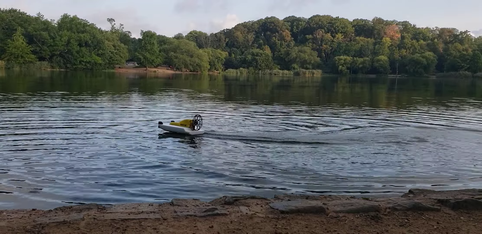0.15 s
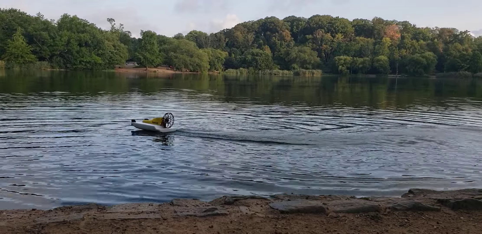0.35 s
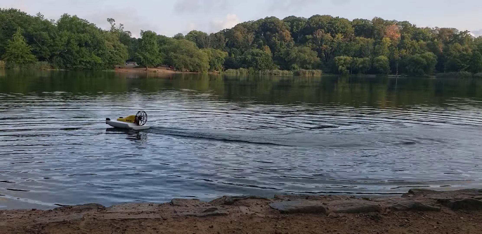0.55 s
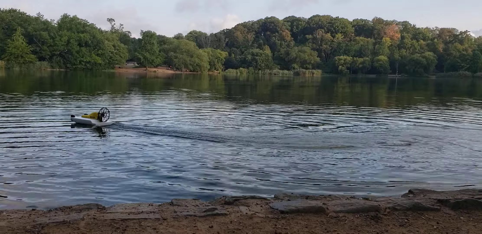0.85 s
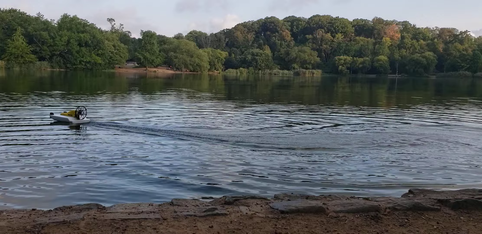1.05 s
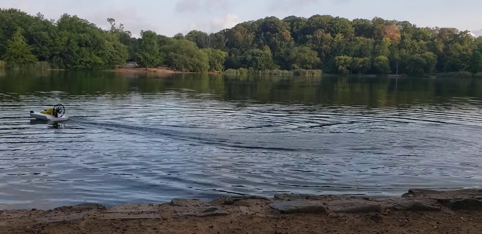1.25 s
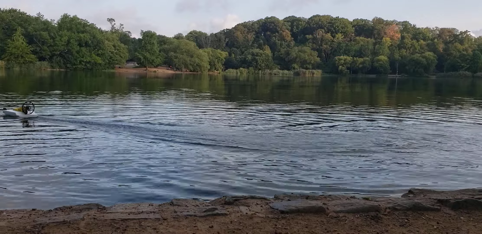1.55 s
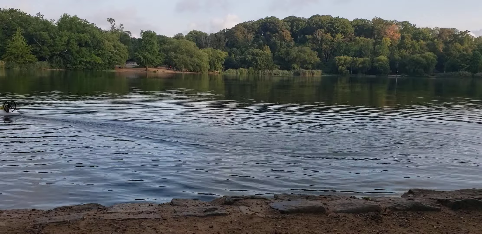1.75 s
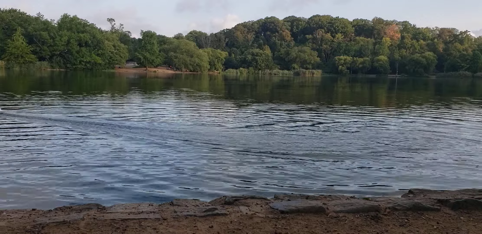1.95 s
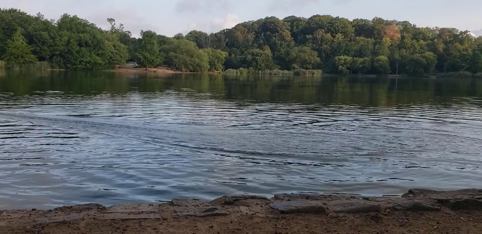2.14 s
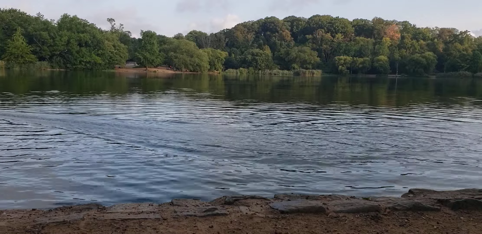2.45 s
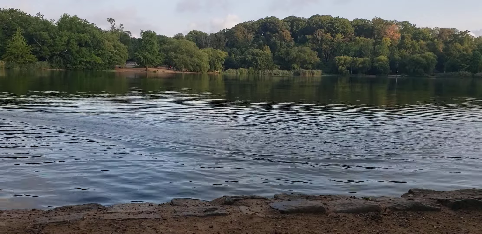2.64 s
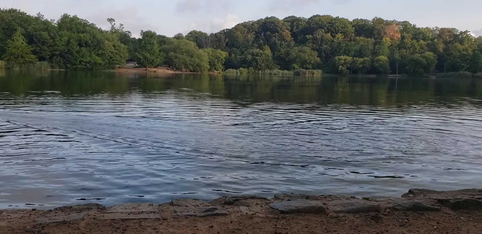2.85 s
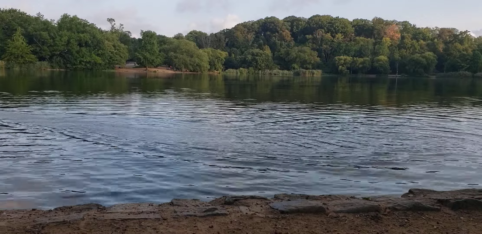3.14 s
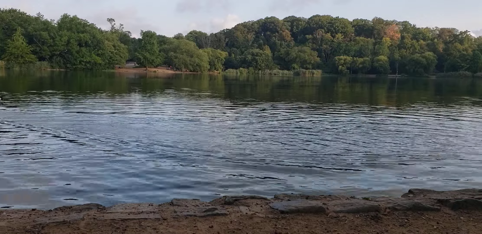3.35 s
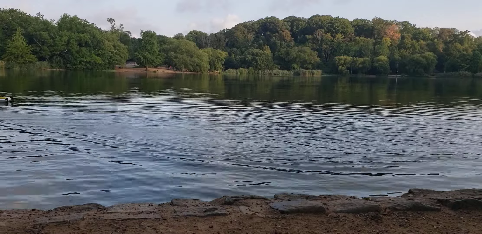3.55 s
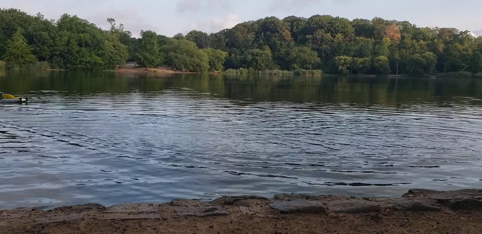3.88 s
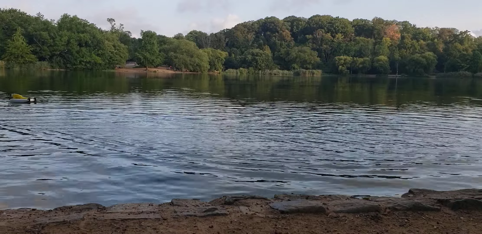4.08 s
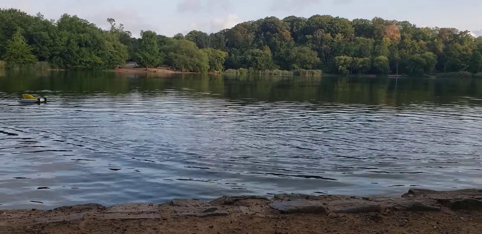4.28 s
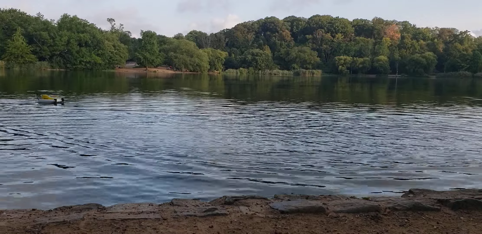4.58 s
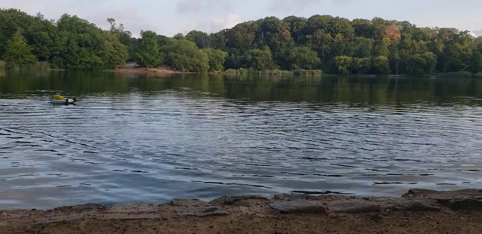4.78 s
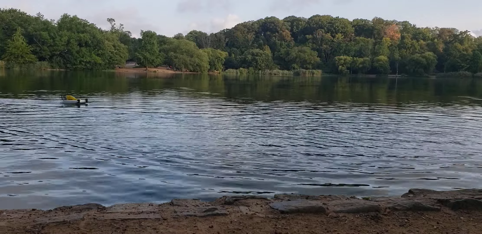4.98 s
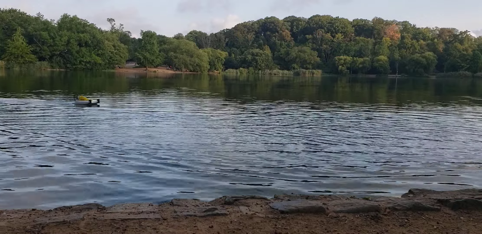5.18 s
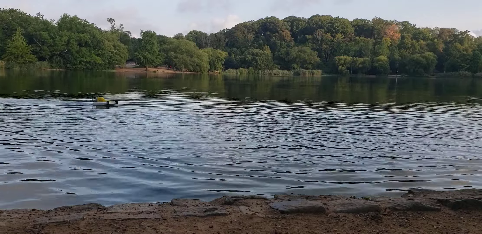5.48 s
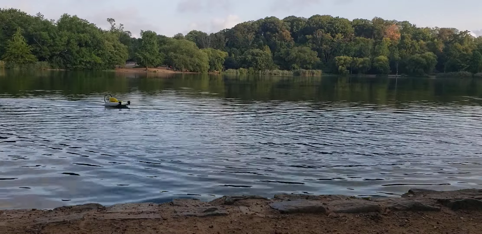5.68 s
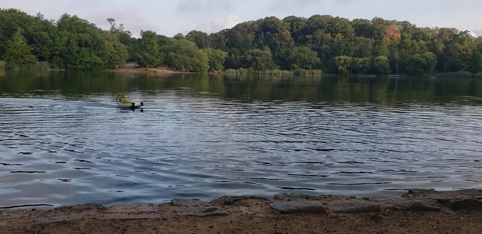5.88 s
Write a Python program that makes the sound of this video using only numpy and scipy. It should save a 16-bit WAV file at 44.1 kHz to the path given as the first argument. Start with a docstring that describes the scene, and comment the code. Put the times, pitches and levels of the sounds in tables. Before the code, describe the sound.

Over a far traffic rumble, a small electric propeller boat buzzes and whistles thinly, easing off several times before returning to full speed.

```python
"""A model airboat turns on a lake, heard from the left by two spaced microphones over far traffic.
First it heads away at full speed: its electric motor and air propeller whine, the blades tear the air
and the speed controller whistles. From about 2 s the throttle dips and recovers several times as the
boat swings round. Soon after 4 s it is back at full speed and coming closer. The whistle is faint
by then, and swells again at the very end."""
import sys
import numpy as np
from scipy import signal
from scipy.fft import rfft, irfft
from scipy.io import wavfile
from scipy.ndimage import uniform_filter1d

SR = 44100
rng = np.random.default_rng(int(sys.argv[2]) if len(sys.argv) > 2 else 0)


def persist_wave(psi):
    """Save psi, clipped to +-1, as 16-bit WAV."""
    counts = np.round(np.clip(psi, -1, 1) * 32767).astype(np.int16)
    wavfile.write(sys.argv[1], SR, np.atleast_2d(counts).T)


N = 291942
TIME = np.arange(N) / SR
STEPS = np.arange(0, N + 128, 128) / SR  # a coarser clock for slow changes, in seconds
SIDES = np.array([[.5], [-.5]])  # splits a difference between the left and right microphones


def gain_of(db):
    """Turns decibels into a number to multiply by."""
    return 10 ** (np.asarray(db) / 20)


def at_pitch(points, hz):
    """Looks up a table at the frequencies hz, on a log scale."""
    f, value = np.transpose(points)
    return np.interp(np.log(hz + 1), np.log(f + 1), value)


def curves(rows, t=STEPS):
    """Looks up every column of a table at the times t."""
    times, *columns = np.transpose(rows)
    return np.array([np.interp(t, times, column) for column in columns])


def drift(fastest_hz, slant=0.52):
    """A random wobble of typical size 1; more slant favours the slowest swings."""
    hz = np.geomspace(fastest_hz / 20, fastest_hz, num=16)[:, None]
    wobble = (np.sin(2 * np.pi * (hz * STEPS + rng.random(hz.shape))) / hz ** slant).sum(0)
    return wobble / wobble.std()


def hiss(field_db, likeness, lead_s, size, patchy_db):
    """Noise shaped over pitch and time, partly alike in both microphones."""
    frames = dict(fs=SR, nperseg=size, noverlap=size * 3 // 4)
    hz, t, (left, other) = signal.stft(rng.standard_normal((2, N)), **frames)
    patches = uniform_filter1d(rng.standard_normal(left.shape), size=12, axis=0)
    patches = uniform_filter1d(patches, size=10, axis=1)
    alike = np.clip(at_pitch(likeness, hz), 0, 1)[:, None]
    delay = np.exp(-2j * np.pi * hz[:, None] * lead_s(t))
    right = alike * left * delay + np.sqrt(1 - alike ** 2) * other
    gain = np.sqrt(SR / 2) * gain_of(field_db(hz, t) + patchy_db * patches / patches.std())
    return signal.istft(np.array([left, right]) * gain, **frames)[1][:, :N]


# How strong the rumble is at each pitch: f/Hz, level/dB per Hz
RUMBLE_COLOUR = [(15, -100), (28, -77), (40, -73), (52, -58), (60, -52), (68, -59.5), (95, -62), (140, -66),
                 (250, -75), (500, -85.5), (1000, -92.5), (3000, -100), (7600, -102), (8700, -116),
                 (10000, -103), (15000, -104)]
# How alike the rumble is left and right: f/Hz, likeness/0 to 1
RUMBLE_LIKENESS = [(60, 0.99), (150, 1), (400, 0.58), (1500, 0.036), (5000, 0.033)]
# The roar's fade, used as a change around its average: t/s, level/dB
ROAR_FADE = [(0, -43), (1.1, -43.5), (2.8, -45), (6.62, -47.5)]


def rumble():
    """Far traffic and air over the lake: a steady drone near 60 Hz, and a roar above it that fades."""
    def field_db(hz, t):
        roar_db = curves(ROAR_FADE, t)[0]
        roar_band = at_pitch([(70, 0), (120, 1), (400, 1), (900, 0)], hz)[:, None]
        return at_pitch(RUMBLE_COLOUR, hz)[:, None] + roar_band * (roar_db - roar_db.mean())
    return hiss(field_db, RUMBLE_LIKENESS, lead_s=lambda t: .00009, size=4096, patchy_db=0.87)


# Moves of the throttle stick: t/s, new setting/share of full speed
STICK_MOVES = [(1.891, .7367), (2.109, 1.0022), (2.417, .8084), (2.517, .9573), (2.695, 1.0035),
               (3.0215, .7256), (3.167, .8953), (3.5, .7567), (3.742, .6829), (3.8615, .8887),
               (4.016, 1.0021)]


def throttle_speed(move_s=.198, motor_lag_s=.1):
    """Share of full speed: the stick slides to each setting and the motor follows a little late."""
    starts, setting = np.transpose(STICK_MOVES)
    progress = np.clip((STEPS - starts[:, None]) / move_s, 0, 1)
    moved = np.diff(setting, prepend=1) @ progress
    inertia = np.exp(-STEPS[1] / motor_lag_s)
    return 1 + signal.lfilter([1 - inertia], [1, -inertia], moved)


# How fast the shaft spins at full throttle: t/s, f/Hz
FULL_SPIN = [(0, 267.6), (.5, 266.6), (.9, 265.1), (1.9, 264.7), (4.6, 266.5), (5.2, 266.7), (5.8, 266.9),
             (6.35, 266.7), (6.62, 266.0)]


def shaft_hz():
    """How many times a second the motor and propeller turn."""
    return throttle_speed() * curves(FULL_SPIN)[0]


# How much sooner the boat's sound reaches the left microphone: t/s, lead/ms
LEFT_LEAD = [(0, 0.0087), (.45, 0.069), (1.05, 0.14), (1.65, 0.2), (2.85, 0.25), (3.15, 0.25), (3.75, 0.23),
             (4.65, 0.19), (5.25, 0.17), (6.62, 0.081)]


def boat_tone(hz, db, shift_turns=0, sway_db=1.4):
    """One pure tone: it reaches the left microphone first, and moving air sways it between the two."""
    turns = np.cumsum(hz) * STEPS[1] + shift_turns + SIDES * hz * curves(LEFT_LEAD) / 1000
    gains = np.sqrt(2) * gain_of(db + 2 * SIDES * sway_db * drift(25, slant=0))
    return np.array([np.interp(TIME, STEPS, gain) * np.sin(2 * np.pi * np.interp(TIME, STEPS, turn))
                     for gain, turn in zip(gains, turns)])


# The boat's base levels at full speed: t/s, whine level/dB, rush level/dB, rush bass and top lift/dB
BOAT_LEVELS = [(0, -60.5, -72, 1), (.4, -61, -69, -1), (.75, -60, -72, 4), (1.2, -61, -69.5, -0.5),
               (1.8, -62, -69.5, 1.5), (2.25, -64.5, -71.5, -1.5), (2.7, -64.5, -73.5, 0),
               (2.9, -62, -70, -2.5), (3.2, -66, -75.5, -2), (3.4, -70, -76, -10), (3.8, -68, -75, -3),
               (4.05, -72.5, -75, -6.5), (4.6, -67.5, -79, -2), (4.9, -67.5, -75, -1),
               (5.4, -65.5, -78.5, -1.5), (5.8, -64.5, -78, 0.5), (6.15, -66, -78, 0),
               (6.35, -66.5, -74, 1), (6.62, -67, -75, 1)]
# The rush at each pitch, added to its base level: f/Hz, level/dB per Hz
# Near 2.4 kHz the echo off the water cancels the direct sound and leaves a dip.
RUSH_COLOUR = [(150, -9.5), (400, -15), (900, -16.5), (1700, -13), (2050, -15), (2350, -21), (2750, -14.5),
               (3200, -14.5), (3900, -14.5), (4600, -13.5), (5300, -15), (6200, -11.5), (7000, -11.5),
               (7900, -20.5), (8700, -56), (9800, -22.5), (11000, -18), (14500, -18)]
# How alike the rush is left and right: f/Hz, likeness/0 to 1
RUSH_LIKENESS = [(500, 0.99), (1200, 0.53), (2000, 0.97), (3200, 0.87), (5000, 0.63), (7500, 0.29),
                 (12000, 0.38)]


def propeller_rush(speed_power=0.79):
    """Air torn by the blades: it gets louder with speed and pulses once and twice a turn."""
    gusts_db = 0.49 * drift(30, slant=0)

    def field_db(hz, t):
        level_db, lift_db = curves(BOAT_LEVELS, t)[1:]
        level_db += speed_power * 20 * np.log10(np.interp(t, STEPS, throttle_speed()))
        level_db += np.interp(t, STEPS, gusts_db)
        bass_and_top = at_pitch([(2500, 1), (4500, 0), (8000, 0), (10000, 1)], hz)[:, None]
        return level_db + bass_and_top * lift_db + at_pitch(RUSH_COLOUR, hz)[:, None]
    angle = 2 * np.pi * np.cumsum(np.interp(TIME, STEPS, shaft_hz())) / SR
    pulse = 1 + 0.042 * np.cos(angle) + 0.36 * np.cos(2 * angle)
    air = hiss(field_db, RUSH_LIKENESS, lambda t: curves(LEFT_LEAD, t) / 1000, size=1024, patchy_db=1.63)
    return pulse * air


# How fast the boat nears the shore (minus means leaving): t/s, speed/(m/s)
SHORE_SPEED = [(0, 0), (.7, -1), (1.9, -1.5), (3.03, -1.7), (3.25, -1.2), (3.9, .55), (4.3, .7),
               (5.1, 1.25), (6, 1.72), (6.62, 1.8)]
# How loud the whistle is: t/s, level/dB
WHISTLE_LEVEL = [(0, -66), (.08, -50), (.28, -46.5), (.31, -63), (.36, -43.5), (.55, -46), (.65, -44),
                 (.74, -44.5), (1.12, -43.5), (1.4, -50.5), (1.66, -52.5), (2.2, -55.5), (2.5, -54.5),
                 (2.73, -56), (2.95, -46), (3.05, -53), (3.28, -55), (3.42, -53), (3.8, -57), (4.23, -56),
                 (4.3, -67), (4.7, -62), (5.7, -62.5), (5.8, -68.5), (6.3, -57), (6.62, -48)]
# A lower tone, as loud as it would be right on the resonance: t/s, level/dB
LOWER_TONE_LEVEL = [(0, -68), (1.85, -67), (2.17, -61), (2.3, -46), (2.42, -53), (2.6, -53.5), (2.75, -53),
                    (3.1, -61), (3.22, -49.5), (3.3, -44.5), (3.5, -44.5), (3.7, -46.5), (3.95, -45),
                    (4.2, -43), (4.3, -51.5), (4.45, -55), (6.3, -68), (6.62, -64)]
# The tone an octave above the whistle: t/s, level/dB
OCTAVE_LEVEL = [(0, -55), (.15, -49), (.3, -74), (.62, -61), (.94, -71), (1.38, -59), (1.95, -72),
                (2.08, -58), (2.3, -80), (2.5, -67), (3, -73), (3.12, -63), (3.4, -75), (3.85, -61),
                (4.1, -72), (6.16, -72), (6.62, -66)]
# The tones on either side of the whistle: offset/shaft rates, level/dB against the whistle's average
NEIGHBOUR_TONES = [(-1, -13), (1, -16)]


def controller_whistle(switching_hz=5915, resonance_hz=4230, resonance_width_hz=128):
    """The speed controller's fast switching whistles; the spinning shaft adds tones beside it."""
    hz = switching_hz * (1 + curves(SHORE_SPEED)[0] / 343)  # higher when nearing; sound goes 343 m/s
    whistle_db = curves(WHISTLE_LEVEL)[0]
    sound = boat_tone(hz, whistle_db + 1.5 * drift(45, slant=0))
    lower_hz = hz - 7 * shaft_hz()  # rings out as it slides past the resonance
    resonance_db = -10 * np.log10(1 + (2 * (lower_hz - resonance_hz) / resonance_width_hz) ** 2)
    sound += boat_tone(lower_hz, curves(LOWER_TONE_LEVEL)[0] + resonance_db + 0.83 * drift(18))
    sound += boat_tone(2 * hz, curves(OCTAVE_LEVEL)[0] + 3 * drift(15))
    softened_db = whistle_db.mean() + 0.19 * (whistle_db - whistle_db.mean())  # smaller swells
    for offset, db in NEIGHBOUR_TONES:
        sound += boat_tone(hz + offset * shaft_hz(), softened_db + db + 6 * drift(10))
    return sound


# Harmonics are tones at 1, 2, 3... times the shaft rate. The lowest two: t/s, level/dB, level/dB
LOW_HARMONICS = [(0, -37, -66), (.3, -38.5, -52.5), (.5, -43, -60), (1.05, -50.5, -63), (1.35, -48, -57.5),
                 (1.9, -51.5, -59), (2.25, -58.5, -85), (2.4, -51, -60.5), (2.58, -49.5, -56.5),
                 (2.75, -51.5, -55.5), (3.05, -53.5, -52), (3.2, -66, -54.5), (3.4, -56, -67.5),
                 (3.75, -59, -57.5), (4.05, -62, -69), (4.3, -57.5, -67), (5.2, -62, -56.5),
                 (6.62, -53.5, -56.5)]
# Eight moments at which the whine's mix of harmonics is set: t/s
MIX_TIMES = (.3, 1.1, 1.8, 2.4, 2.9, 3.7, 4.7, 5.9)
# One row for each harmonic from the third up, added to the whine level: level/dB at each moment
HARMONICS = [(-2, 2, 1, -1, 0, 3, -3, -1), (2, 6, 5, 5, 2, 5, 6, 8), (11, 10, 11, 9, -1, 2, 5, 4),
             (7, 7, 7, 7, 2, 2, 7, 5), (9, 8, 9, 10, 10, 2, -2, 2), (8, 6, 5, 2, 6, 6, 5, 9),
             (0, 4, 2, 3, 2, 7, 6, 7), (5, 0, -1, 1, 4, 0, 4, 3), (5, 1, 1, 4, 6, -1, 5, 3),
             (7, 9, 8, 3, 3, 1, 3, 2), (3, -2, 0, -2, 3, 7, 6, 8), (-3, -7, -1, -3, 2, -1, 4, 1),
             (-5, -1, 2, 1, 2, -7, -6, -6), (4, 4, 7, 0, 1, -1, 4, 2), (2, 2, 1, -5, 6, 5, 2, 3),
             (-4, -5, -6, -4, -3, -15, 7, 4), (-3, -2, 0, -1, 0, -15, -3, -2), (-1, -1, 5, 0, -5, -2, 3, 3),
             (2, 3, 0, -2, 5, 4, 2, 0), (0, -5, -15, -6, -15, 0, 2, 0), (-3, -7, -4, 0, -15, 0, 2, -2),
             (-7, -4, -5, -5, -2, -4, -2, -3), (-3, -5, -3, -15, -2, -15, -5, -6),
             (-1, -2, -6, -8, -2, -5, -3, -7), (0, -5, -9, -12, -15, -4, -1, -6),
             (-6, -4, -4, -8, -4, -15, -6, -7), (-4, -2, -8, -5, -4, -14, -12, -10)]
# One more such row, shared by the 14 highest harmonics: level/dB at each moment
TOP_HARMONICS = (-8.5, -7.5, -11.5, -13, -10, -38, -20, -17)


def motor_whine(speed_power=1.05, flicker_db=1.3):
    """Motor and propeller sing a stack of flickering harmonics whose mix changes over time."""
    hz = shaft_hz() * (1 + 0.00046 * drift(24.94))
    speed_db = speed_power * 20 * np.log10(throttle_speed())
    whine_db = curves(BOAT_LEVELS)[0] + speed_db + 1.5 * drift(30, slant=0)
    first_db, second_db = curves(LOW_HARMONICS)
    sound = boat_tone(hz, first_db + 2 * drift(10))
    sound += boat_tone(2 * hz, second_db + 2.6 * drift(9))
    for harmonic, mix_db in enumerate(HARMONICS + 14 * [TOP_HARMONICS], start=3):
        db = whine_db + np.interp(STEPS, MIX_TIMES, mix_db)
        shift_turns = .09 * drift(.6) - .25  # loosely in step: one smeared pulse of suction each turn
        sound += boat_tone(harmonic * hz, db + flicker_db * drift(45, slant=0), shift_turns)
    return sound


def scene():
    """The boat's three sounds over the far rumble."""
    return motor_whine() + controller_whistle() + propeller_rush() + rumble()


# How much louder the left microphone is than the right: f/Hz, level/dB
MIC_BALANCE = [(60, -0.5), (110, -2.5), (200, 0), (380, -1.5), (700, -1.5), (1290, 0.5), (2380, -1.5),
               (4400, -0.5), (8120, -4), (15000, 6)]
# How far the left microphone's wave runs ahead of the right's: f/Hz, phase/rad
MIC_PHASE = [(600, 0.046), (1050, 0.29), (1330, -0.13), (1600, 0.22), (1850, 0.37), (2300, 0.13),
             (2700, 0.027)]


def record(dry):
    """The two microphones differ a little in tone and timing, and the highest treble is cut off."""
    hz = np.fft.rfftfreq(N, 1 / SR)
    balance = gain_of(SIDES * at_pitch(MIC_BALANCE, hz))
    phase = np.exp(1j * SIDES * at_pitch(MIC_PHASE, hz))
    coloured = irfft(rfft(dry) * balance * phase, N)
    treble_cut = signal.firwin(511, cutoff=14520, window=("kaiser", 9), fs=SR)
    return signal.oaconvolve(coloured, treble_cut[None], "same")


dry = scene()
out = record(dry)
persist_wave(out)
```